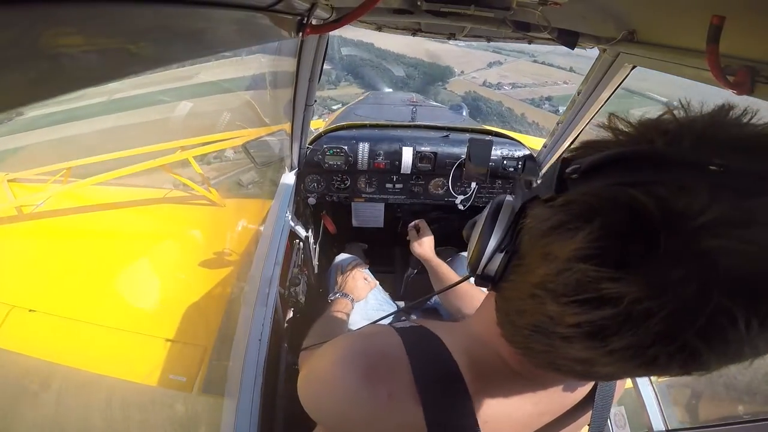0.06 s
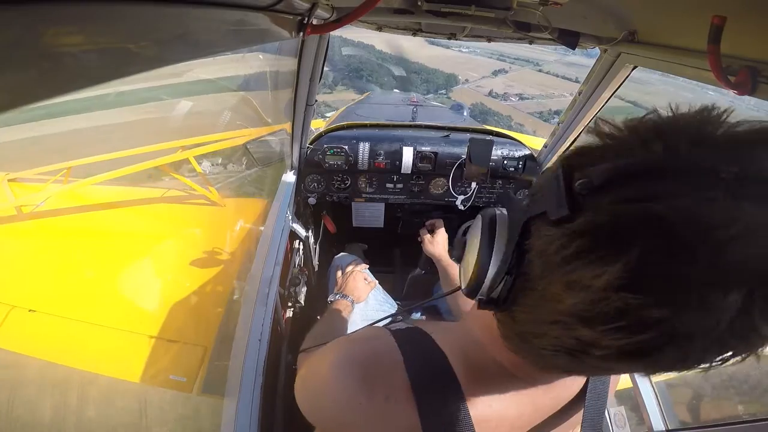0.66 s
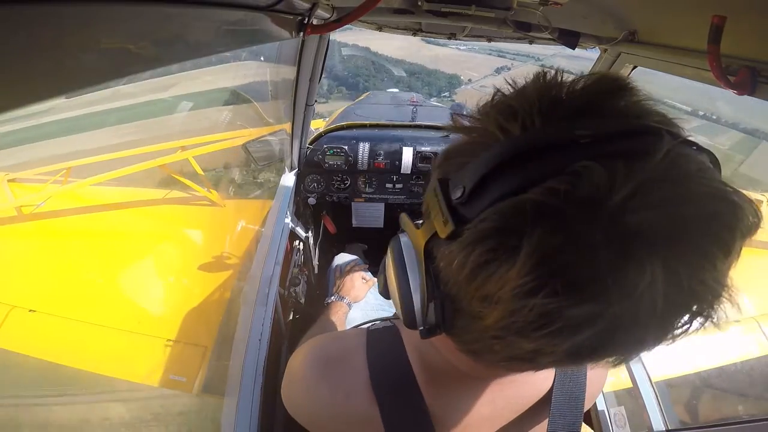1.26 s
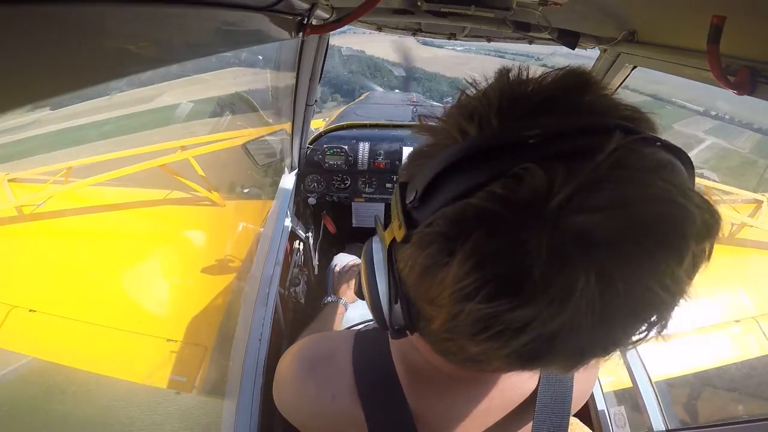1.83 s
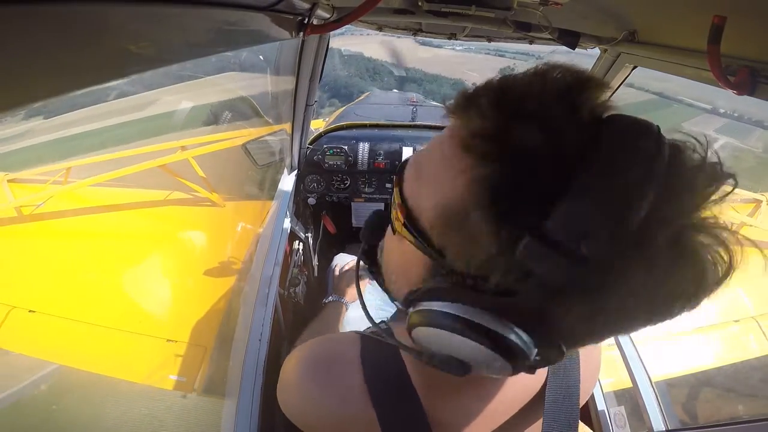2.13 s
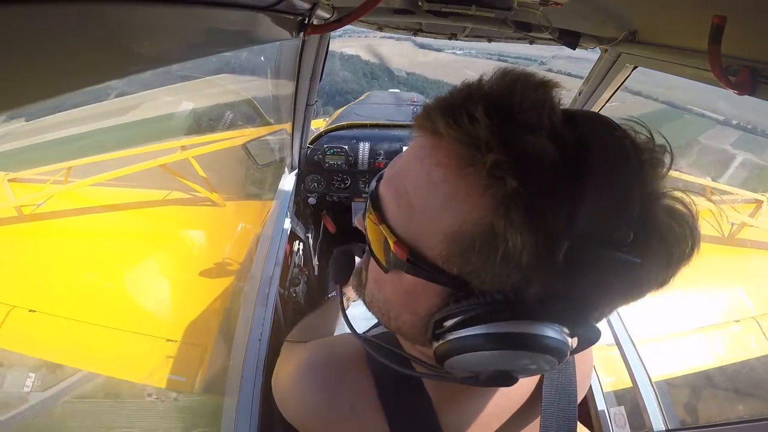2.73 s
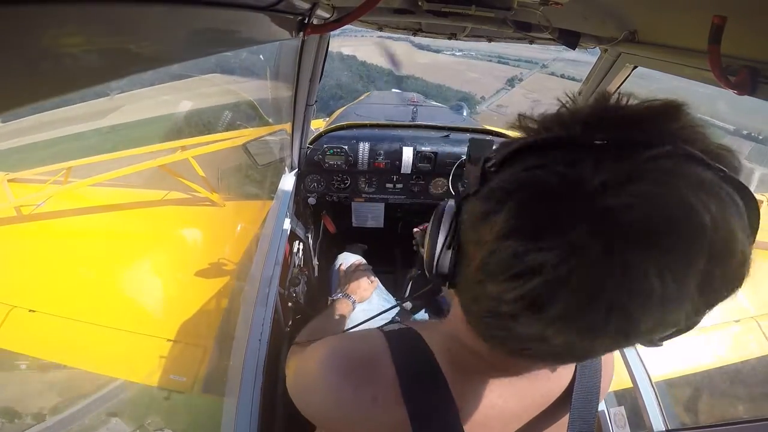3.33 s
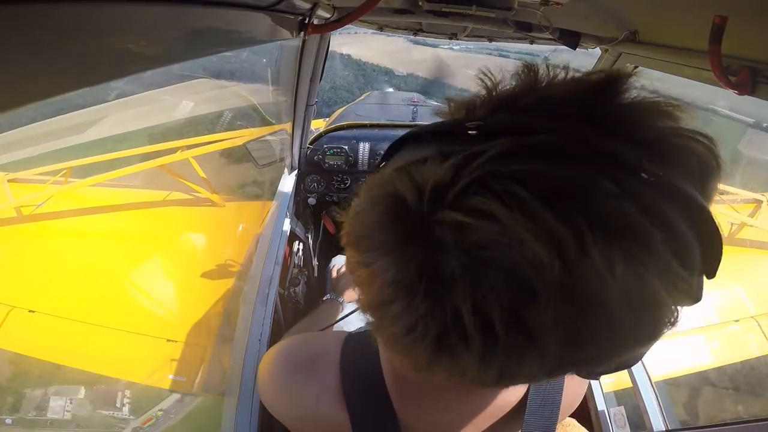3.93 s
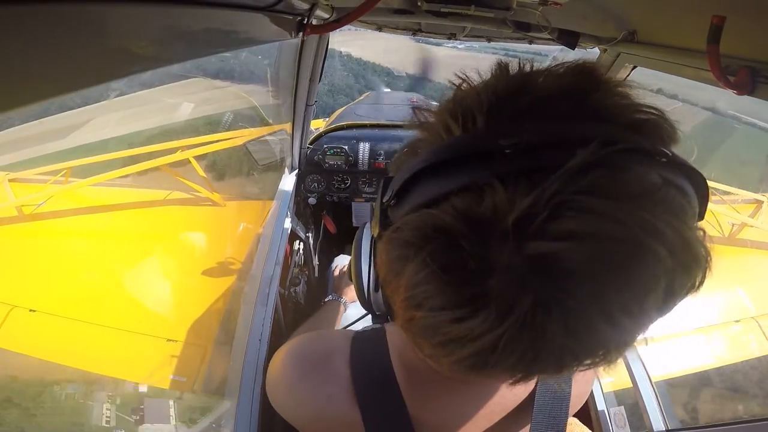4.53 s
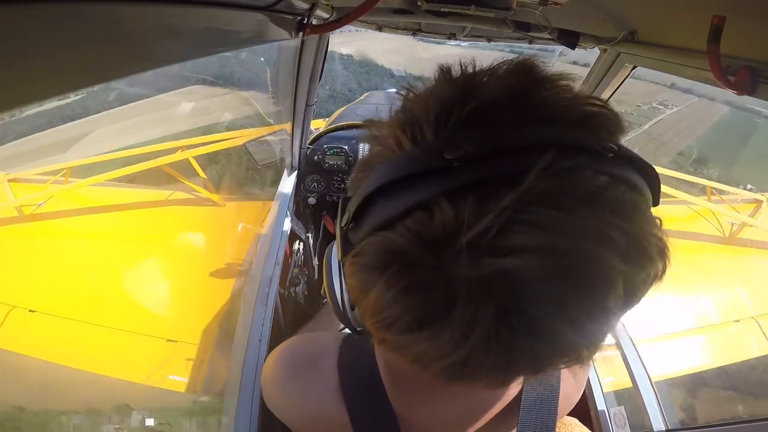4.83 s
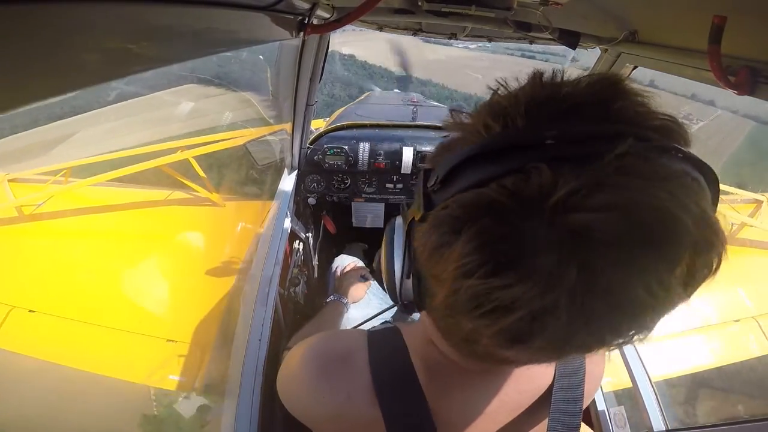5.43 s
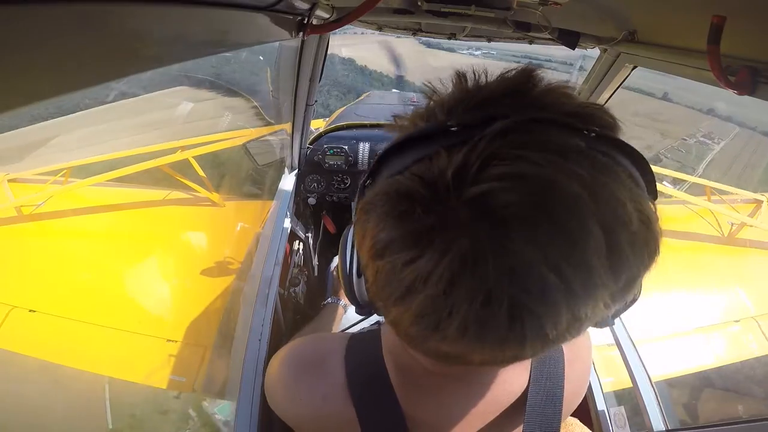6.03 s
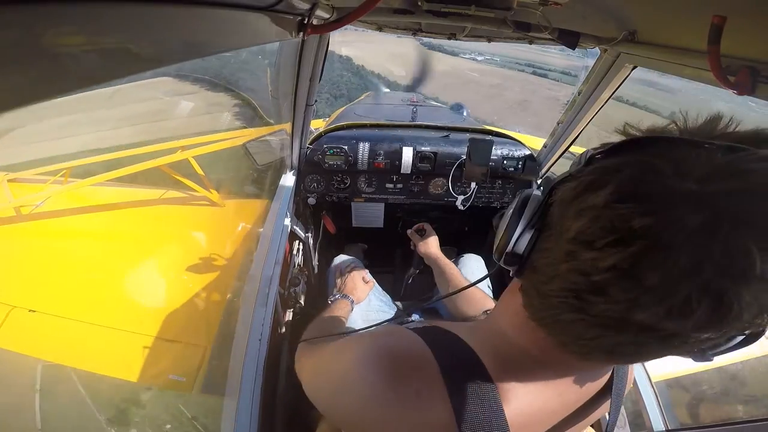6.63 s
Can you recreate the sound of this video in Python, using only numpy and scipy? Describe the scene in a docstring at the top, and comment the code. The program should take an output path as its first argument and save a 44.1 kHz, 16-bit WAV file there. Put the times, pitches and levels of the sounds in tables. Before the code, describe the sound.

A light aircraft's throttled-back piston engine throbs slowly, heard inside the cockpit with rushing air, low cabin booms and a faint whistle.

```python
"""Inside a light aircraft gliding down with its piston engine throttled back. From the start, the slow
engine and propeller throb, rough air makes the cabin boom, and the slipstream (the air flowing past)
rushes over the windows and whistles faintly in the door gaps. At 1 s the engine briefly runs a little
faster. The rush swells near 1.5 s and dips at 2 s. It sinks again after 5 s, the high whistle fades,
and by about 6 s both are back."""
import sys
import numpy as np
from scipy import signal
from scipy.fft import rfft, irfft
from scipy.io import wavfile
from scipy.ndimage import uniform_filter1d

SR = 44100
rng = np.random.default_rng(int(sys.argv[2]) if len(sys.argv) > 2 else 0)


def wav_record(signal):
    """Record a signal, one row per channel, as 16-bit PCM in the file named by sys.argv[1]."""
    frames = np.transpose(np.atleast_2d(signal))
    bounded = np.clip(frames, -1, 1)
    # unit amplitude maps onto the largest positive 16-bit level
    quanta = np.round(bounded * 32767).astype(np.int16)
    wavfile.write(sys.argv[1], SR, quanta)


N = 294588
TIME = np.arange(N) / SR
FREQS = np.fft.rfftfreq(N, 1 / SR)

# How loud the high whistle is: time_s, level_db
HIGH_WHISTLE = [(0.0, -49), (0.65, -50.5), (0.85, -47.5), (1.9, -47.5), (2.1, -49), (3.6, -49), (3.82, -45),
                (4.15, -51), (5.05, -46), (5.7, -55.5), (5.95, -45), (6.68, -51.5)]
# How far the slipstream is above or below its usual strength: time_s, change_db
AIRFLOW = [(0.0, 0.7), (0.45, 1), (0.65, -0.1), (1.45, 0.5), (1.55, 2), (1.9, 1.4), (2.05, -1.7),
           (2.62, 0.9), (2.85, -0.95), (3.7, -0.7), (3.82, -0.2), (4.05, -1.0), (5.05, 0.6), (5.25, -2),
           (5.65, -2), (6.18, 1.5), (6.68, 0.3)]
# The overall tone of the air noise, from bass to treble: frequency_hz, relative_level_db
AIR_TONE = [(12, -39), (25, -17), (60, 1), (115, 0), (190, -6.5), (245, -14), (470, -31), (560, -24.5),
            (1800, -27.5), (3500, -35.5), (3750, -41), (6800, -45.5), (8600, -57.5), (13300, -61.5)]
# Pitches that the cabin and windows boost or weaken: pitch_hz, width_hz, change_db
CABIN_RESONANCES = [(86, 15.4, -6.5), (146, 15.5, 6), (171.3, 14, -0.5), (242.4, 26, -5), (395, 24, 0),
                    (415, 43, 6), (502, 23, 2.5), (789, 140, 3.5), (972, 41, -5.5), (1488, 146, 3.5),
                    (1620, 89, 4.5), (1736, 45, 5), (2270, 276, 4.5), (2626, 220, -2.5), (3000, 210, 3.5),
                    (3327, 330, 6.5), (4150, 60, 3), (4678, 400, 4.5), (5560, 200, 3.5), (5970, 200, -3),
                    (6230, 337, 3.5), (10056, 1070, 5)]
# Jolts of rough air that make the cabin boom: start_s, length_s, level_db
BUFFETS = [(-0.012, 0.26, -21.5), (0.346, 0.17, -22.5), (0.712, 0.047, -21.5), (0.828, 0.044, -22.5),
           (1.25, 0.045, -23), (1.358, 0.033, -24), (1.69, 0.089, -22), (2.236, 0.047, -23),
           (2.985, 0.041, -23), (3.333, 0.038, -24), (3.573, 0.022, -23), (4.15, 0.036, -23.5),
           (4.35, 0.069, -22.5), (4.514, 0.04, -24.5), (4.78, 0.028, -24.5), (4.909, 0.066, -20.5),
           (5.822, 0.03, -24.5), (6.39, 0.1, -21)]
# How loudly the air drums on the aircraft's skin: time_s, level_db
DRUMMING = [(0.0, -43), (1.35, -41), (1.9, -41.5), (2.15, -46.5), (2.78, -48), (2.92, -40.5), (4.25, -46.5),
            (5.4, -46), (6.4, -40.3), (6.68, -43.5)]
# How fast the engine's shaft spins: time_s, turns_per_s
SHAFT_SPEED = [(0, 18.7), (.4, 18.9), (1, 19.4), (1.3, 18.9), (1.8, 18.7), (3.2, 18.75), (3.7, 19.1),
               (4.4, 18.75), (5.3, 18.45), (5.9, 18.8), (6.68, 18.65)]
# The engine's tones: cycles_per_turn, relative_level_db, unsteadiness (0 to 1)
ENGINE_TONES = [(2, -16, 0.3), (3, -0.6, 0.19), (4, -13, 0.7), (5, -20.5, 0.3), (6, -16.5, 0.66)]
# Moments when the engine's throb swells: start_s, length_s, level_db
THROB_SURGES = [(1.113, 0.14, -22.5), (1.71, 0.027, -26.5), (1.838, 0.17, -20.5), (2.602, 0.33, -22),
                (3.151, 0.051, -22), (3.45, 0.069, -22), (3.756, 0.096, -20), (4.55, 0.037, -24),
                (4.83, 0.028, -21.5), (5.065, 0.27, -21), (6.152, 0.074, -23.5), (6.357, 0.045, -22),
                (6.523, 0.15, -22)]
# Moments when the throb briefly dies down: start_s, length_s
THROB_LULLS = [(.66, 0.07), (1.55, 0.078), (2.15, .04), (3.35, 0.036), (3.954, .04)]


def gain_of(db):
    """Turns decibels into a number to multiply a sound by."""
    return 10 ** (np.asarray(db) / 20)


def unit_level(x):
    """Scales a signal so that its average strength (rms) is 1."""
    return x / np.sqrt(np.mean(x ** 2) + 1e-20)


def curve(table):
    """Joins a table's (time, value) points with straight lines."""
    times, values = np.transpose(table)
    return np.interp(TIME, times, values)


def noise(gain):
    """Random noise; gain sets its strength at each frequency."""
    return irfft(rfft(rng.standard_normal(N)) * gain, N) * np.sqrt(SR / 2)


def drift(hz):
    """A slow random wobble of strength 1, mostly slower than hz."""
    return unit_level(noise(1 / (1 + (FREQS / hz) ** 4)))


def ringing(hz, width_hz, steady_s):
    """Rough air rings one pitch: it flutters, but its strength evens out over steady_s."""
    off_pitch = (FREQS ** 2 - hz ** 2) / (width_hz * FREQS + 1e-9)
    ring = unit_level(noise(1 / np.sqrt(1 + off_pitch ** 4)))
    window = int(steady_s * SR)
    power = uniform_filter1d(uniform_filter1d(ring ** 2, window), window)
    return unit_level(ring / np.sqrt(power + 1e-4))


def swells(events, rest_db, rise_s, fall_s, wander_db, wander_hz):
    """A wandering level in dB; each event pulls it to its own level, holds it, then lets go."""
    level_db = rest_db + wander_db * drift(wander_hz)
    for start, length, db in events:
        end = start + length
        pull = np.interp(TIME, [start - rise_s, start, end, end + fall_s], [0, 1, 1, 0])
        level_db += pull * (db - level_db)
    return level_db


def blown(db, follow, gust_db=0, gust_hz=1):
    """A gain that follows the airflow, with optional small gusts of its own."""
    return gain_of(db + follow * curve(AIRFLOW) + gust_db * drift(gust_hz))


def door_whistles():
    """Air squeezes through gaps in the door and makes two faint, breathy whistles."""
    low = ringing(hz=1094, width_hz=45, steady_s=0.3) * blown(db=-49.5, follow=0.81, gust_db=1, gust_hz=3)
    high = ringing(hz=2323, width_hz=127, steady_s=0.16) * gain_of(curve(HIGH_WHISTLE))
    return low + high


def cabin_boom():
    """Jolts ring the air in the cabin; about an octave higher, the airflow drums on the skin."""
    boom_db = swells(BUFFETS, rest_db=-30, rise_s=0.02, fall_s=0.026, wander_db=2, wander_hz=6.9)
    boom = ringing(hz=164.5, width_hz=11, steady_s=0.03) * gain_of(boom_db)
    skin = ringing(hz=318, width_hz=22, steady_s=0.12) * gain_of(curve(DRUMMING) + 1.2 * drift(hz=6))
    return boom + skin


def hump(hz, width_hz):
    """A smooth hill of height 1 around one frequency."""
    return 2 ** -((2 * (FREQS - hz) / width_hz) ** 2)


def slipstream():
    """Passing air, shaped by the cabin: a gusty rumble, a rush and a draught at the door."""
    tone_hz, tone_db = np.transpose(AIR_TONE)
    air_db = -47 + np.interp(np.log(FREQS + 1), np.log(tone_hz), tone_db)
    cabin_db = sum(db * hump(hz, width) for hz, width, db in CABIN_RESONANCES)
    tone = gain_of(air_db + cabin_db)
    # The three sounds share out the power at each frequency.
    bass = 1 / (1 + (FREQS / 300) ** 4)
    door = (1 - bass) * 0.98 * hump(hz=1580, width_hz=450)
    rest = (1 - bass) - door
    rumble = noise(tone * np.sqrt(bass)) * blown(db=0.05, follow=0.71, gust_db=1.2, gust_hz=3.5)
    rush = noise(tone * np.sqrt(rest)) * blown(db=0.4, follow=1, gust_db=0.33, gust_hz=25)
    draught = noise(tone * np.sqrt(door)) * blown(db=-0.25, follow=0.95)
    return rumble + rush + draught


def engine():
    """Deep tones follow the shaft; uneven firing at idle shakes their strength and timing."""
    turns = np.cumsum(curve(SHAFT_SPEED)) / SR
    lull_db = -35
    events = list(THROB_SURGES) + [(start, length, lull_db) for start, length in THROB_LULLS]
    throb_db = swells(events, rest_db=-27, rise_s=0.052, fall_s=0.068, wander_db=2, wander_hz=7.8)
    sound = np.zeros(N)
    for per_turn, db, unsteady in ENGINE_TONES:
        # A complex number holds both wobbles: its size is strength, its angle is timing.
        shake = (drift(hz=6.3) + 1j * drift(hz=11)) / np.sqrt(2)
        wobble = np.sqrt(1 - unsteady ** 2) + unsteady * shake
        spin = np.exp(2j * np.pi * (per_turn * turns + rng.random()))
        # The tone at three cycles per turn shakes the aircraft most; only it takes the surges and lulls.
        level_db = db + (throb_db if per_turn == 3 else throb_db.mean())
        sound += unit_level((wobble * spin).real) * gain_of(level_db)
    return sound


def scene():
    """Everything heard from behind the pilot, in one channel."""
    return (engine() + cabin_boom() + slipstream() + door_whistles())[None]


def record(dry):
    """Cuts away the highest treble."""
    cutoff_hz = 13550
    treble_cut = signal.firwin(511, cutoff_hz, window=("kaiser", 9), fs=SR)
    return signal.oaconvolve(dry, treble_cut[None], "same")


dry = scene()
out = record(dry)
wav_record(out)
```